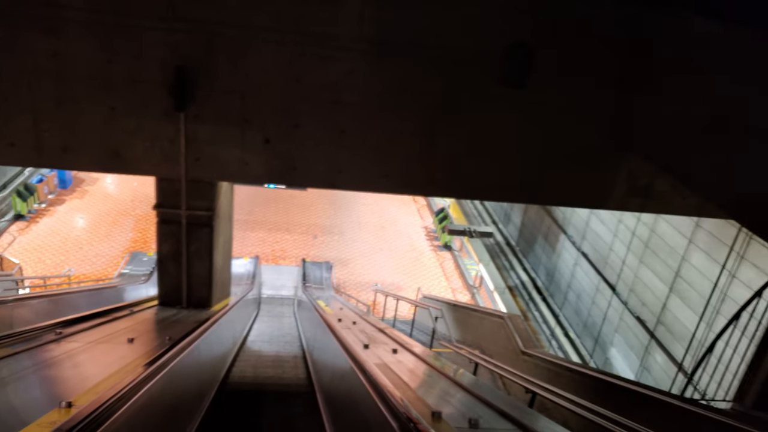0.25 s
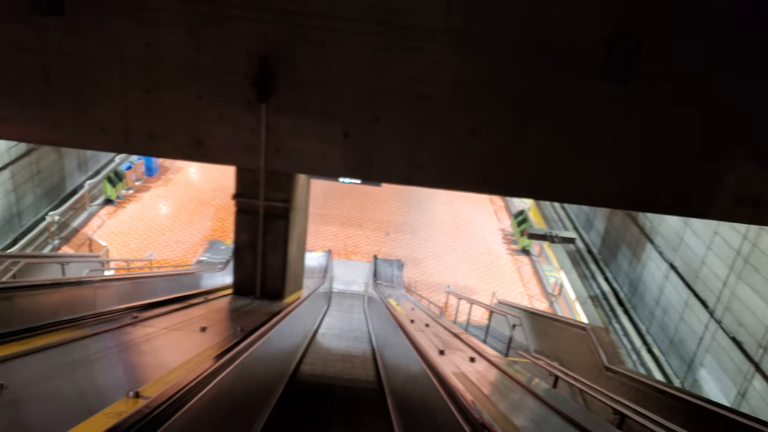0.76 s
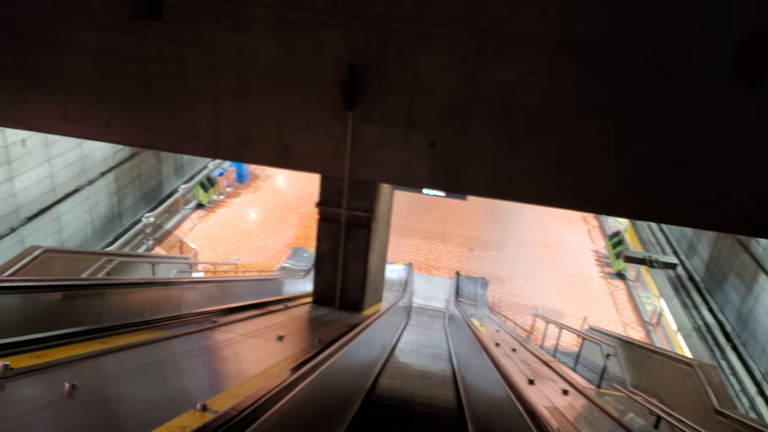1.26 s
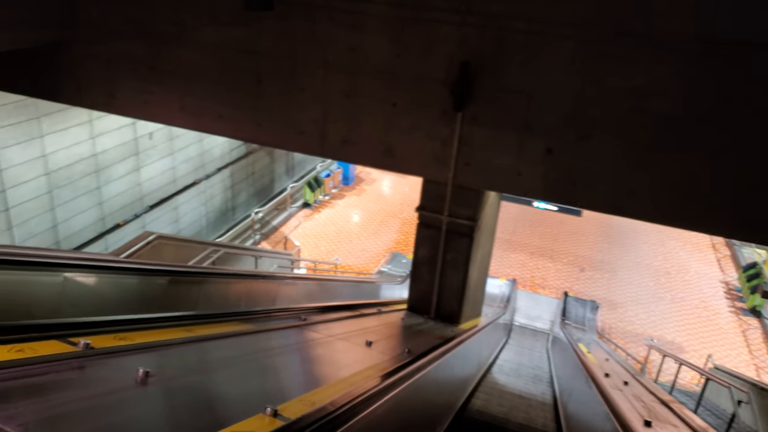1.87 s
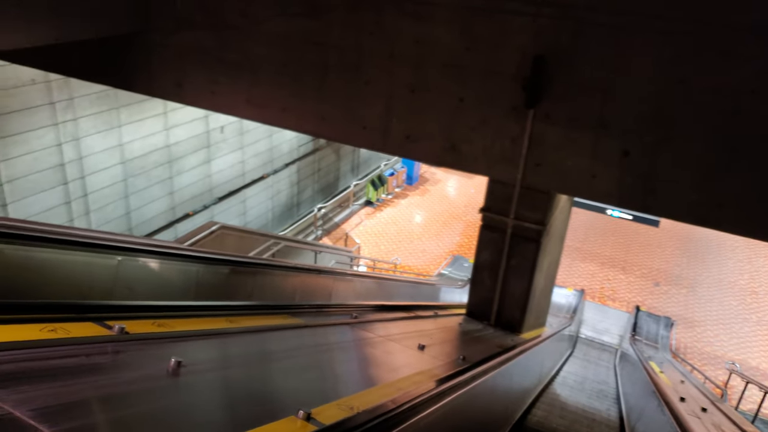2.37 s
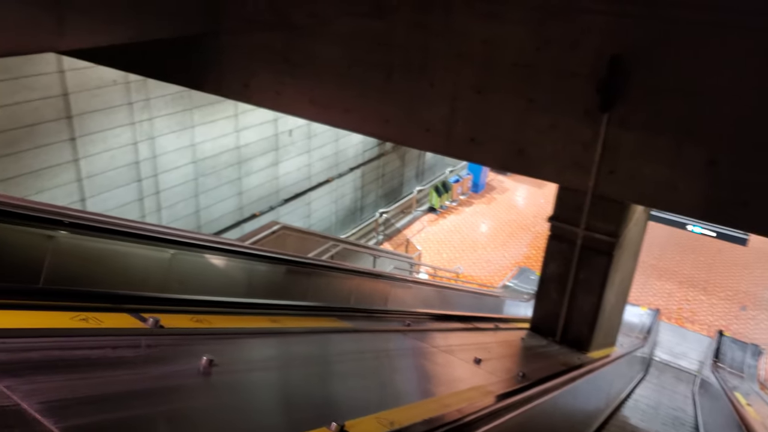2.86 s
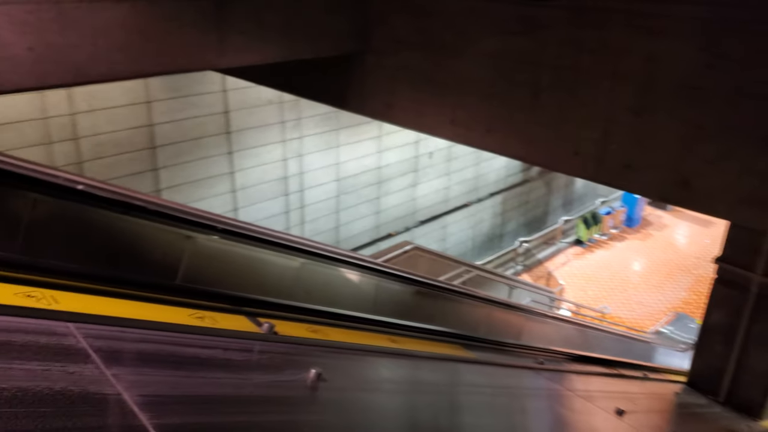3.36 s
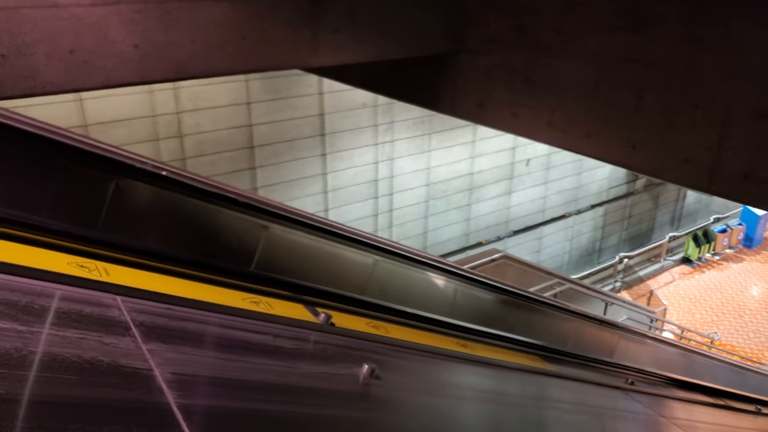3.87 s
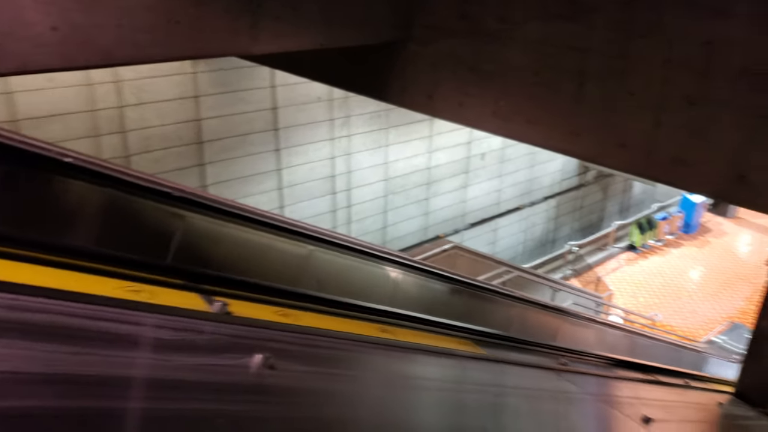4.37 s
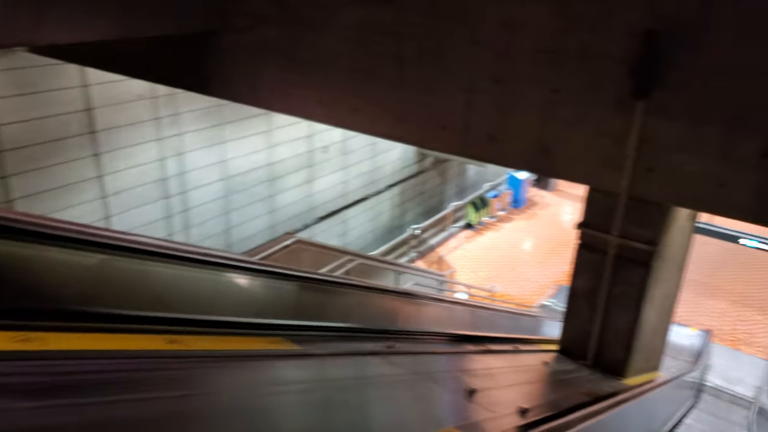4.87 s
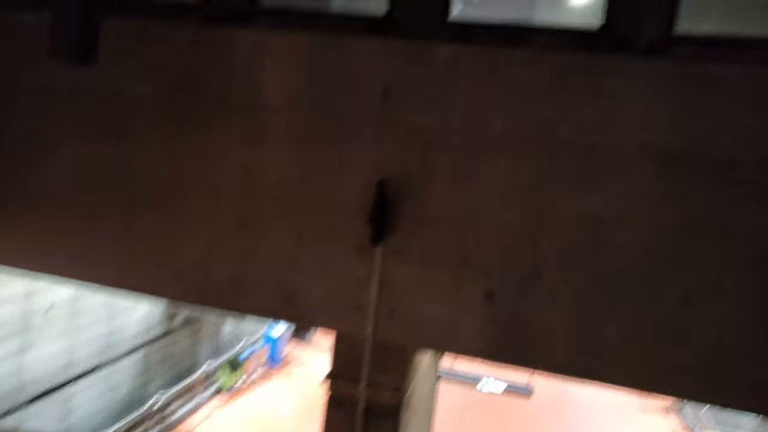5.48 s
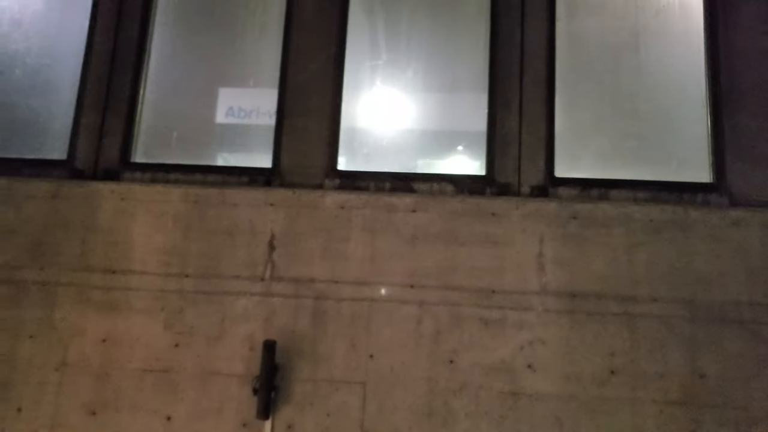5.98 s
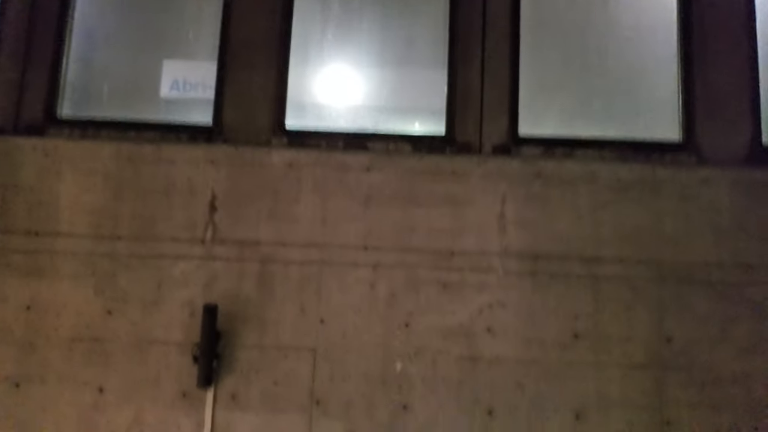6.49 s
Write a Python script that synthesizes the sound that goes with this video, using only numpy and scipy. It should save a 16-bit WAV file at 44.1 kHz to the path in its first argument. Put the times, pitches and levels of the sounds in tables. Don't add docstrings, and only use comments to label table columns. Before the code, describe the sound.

Deep escalator drone, uneven and throbbing, in a reverberant hard-walled hall. Short metallic knocks come at irregular moments, and rollers rub with gritty high chirps. Two long bouts of very high, fluttering squeal sit quietly over the drone, the first loose and swooping, the second tighter and rough, followed by a short whistle. A few tiny dry clicks are close by. Wide stereo, no sharp treble on top.

```python
import sys
import numpy as np
from scipy import signal
from scipy.fft import rfft, irfft
from scipy.io import wavfile
from scipy.ndimage import uniform_filter1d

SR = 44100
rng = np.random.default_rng(int(sys.argv[2]) if len(sys.argv) > 2 else 0)


def put_to_file(sound):
    columns = np.atleast_2d(sound).T
    safe = np.clip(columns, -1, 1)
    whole_steps = np.round(safe * 32767)
    wavfile.write(sys.argv[1], SR, whole_steps.astype(np.int16))


def boost(x):
    u = np.asarray(x, float) / 20
    return 10 ** u


N = 297234
TIME = np.arange(N) / SR
HZ = np.fft.rfftfreq(N, 1 / SR)
NEAR_LEAD = 21.3

# time_s, level_db
HALL_LOUDNESS = [(0.0, -0.5), (0.58, 1), (0.7, 0.84), (2.1, -0.2), (4.3, 0.2), (4.5, 0.34), (5.5, 0),
                 (5.62, 1), (6.74, 1.4)]
# freq_hz, density_db
RUMBLE_COLOUR = [(25, -42), (38, -16), (52, 1), (65, -1), (100, -2), (170, -10), (260, -12), (310, -15.5),
                 (450, -17.5), (520, -15), (600, -20), (800, -22.5), (1000, -35.5), (1500, -62)]
# freq_hz, density_db
CLATTER_COLOUR = [(530, -34), (900, 0.5), (1120, -2.5), (1230, -2), (1590, -5.5), (2500, -8.5), (2860, -10),
                  (3910, -12.5), (5100, -21), (6640, -22), (8450, -31), (13200, -33.5), (15100, -25),
                  (16000, -30)]
# time_s, pitch_hz, level_db
FAR_SQUEAK = [(.525, 2710, -70), (.54, 2690, -53), (.575, 2745, -51), (.59, 2620, -51), (.622, 2620, -51),
              (.634, 2740, -48), (.65, 2720, -58), (.68, 2700, -54), (.73, 2680, -75)]
# start_s, pitch_hz, width_hz, level_db, t60_s
SQUEAKS = [(0.0, 7550, 300, -60, .29), (.22, 7080, 150, -65, .5), (.61, 15200, 900, -60, .4),
           (.71, 7130, 250, -61, .6), (.76, 14200, 500, -66, .4), (.92, 7500, 300, -65, .4),
           (1.27, 7050, 250, -63, .33), (1.495, 7000, 200, -63, .6), (1.64, 7050, 100, -58, .62),
           (1.74, 6780, 150, -64, .46), (2.11, 7740, 200, -61, .8), (1.18, 12200, 900, -67, .6),
           (3.06, 6700, 350, -66, .6), (3.18, 6550, 300, -65, .4), (3.31, 6750, 350, -67, .5),
           (2.82, 6850, 300, -68, .5), (4.08, 5700, 250, -66, .2), (4.13, 6700, 600, -68, .9),
           (4.24, 5950, 250, -67, .3), (4.295, 8450, 100, -68, .15), (4.24, 8420, 100, -64, .2),
           (4.24, 7170, 300, -62, .35), (4.54, 8030, 250, -61, .8), (4.63, 7450, 350, -65, 1.0),
           (4.76, 7080, 200, -64, .55), (4.94, 7000, 300, -66, .5), (5.2, 11200, 1200, -67, .68),
           (5.55, 7380, 400, -60, .95), (5.57, 14500, 900, -66, .4), (.24, 9900, 250, -67, .5),
           (6.26, 7480, 120, -66, .3), (6.355, 7500, 100, -70, .15), (3.1, 8130, 150, -66, .5),
           (5.6, 6950, 300, -65, .9)]
# start_s, pitch_hz,
# width_hz, level_db, t60_s
KNOCKS = [(.02, 1470, 200, -57, 0.34), (.13, 1094, 150, -49, 0.39), (.78, 3265, 40, -65, 3),
          (1.85, 3920, 40, -62, 1.1), (0.0, 3500, 200, -57.5, 0.43), (1.22, 2410, 300, -56.5, .6),
          (.98, 1220, 120, -52, 0.58), (2.37, 1290, 151, -51, 0.62), (4.07, 2020, 700, -51.5, 0.57),
          (4.28, 2500, 200, -52, 0.3), (5.52, 2400, 900, -48.5, 0.55), (5.6, 1275, 200, -54, 3.7),
          (5.94, 2080, 1210, -53, 0.69), (6.03, 2650, 900, -54, 0.42), (6.07, 2300, 1000, -50.5, 0.4),
          (5.3, 52, 20, -38, 1.5), (5.57, 1250, 200, -50, .3), (5.77, 1380, 200, -52, .35),
          (2.24, 2600, 1400, -54, .8), (6.62, 1830, 300, -50.5, 0.88), (5.93, 1290, 500, -59, 2.1),
          (6.6, 1150, 300, -46, 0.64), (6.67, 2600, 395, -53, .6)]
# start_s, peak_db
CHAIN_LINKS = [(1.193, -23), (1.356, -21), (1.673, -27), (1.736, -24), (1.998, -24), (2.163, -29),
               (3.112, -22), (3.227, -23), (3.37, -35), (3.506, -26), (3.574, -19), (.571, -19),
               (5.67, -28), (5.883, -19), (6.062, -18.5), (6.091, -21.5), (3.745, -24), (4.718, -22.5),
               (4.916, -23), (5.177, -20), (5.258, -25), (5.473, -20.5)]
# start_s, peak_db
TICKS = [
    (0.9734, -54),
    (1.2704, -49),
    (5.8933, -45),
]
# pitch_hz, level_db, t60_s
TICK_MODES = [(6600, -1, .008), (9200, -5, .006), (11700, -1, .008)]
# pitch_hz, width_hz, level_db
WHINE_LINES = [(510, 34, -44), (656, 21, -50), (840, 29, -60), (3020, 40, -71), (3272, 30, -63),
               (3625, 32, -66), (3905, 82, -62)]
# time_s, level_db
PANEL_LOAD = [(0.0, -47), (0.49, -43), (0.58, -32.5), (0.69, -47), (0.86, -36.5), (1.24, -42.5),
              (1.69, -36), (1.73, -48), (2.53, -36), (2.57, -47), (3.02, -35), (3.04, -40), (4.17, -37.5),
              (4.18, -45), (5.89, -38.5), (5.95, -48), (5.97, -37), (6.74, -42)]
# start_s, length_s, chirp_db, chirp_hz, hiss_db
RUBS = [(0.232, 0.054, -57, 9250, -66), (0.573, .07, -56.5, 9140, -60), (.74, 0.064, -66, 9250, -65),
        (0.917, .03, -66, 9500, -66), (1.14, .05, -56.5, 9850, -62), (1.277, .05, -61, 9300, -65),
        (1.537, 0.026, -71, 9500, -64), (1.62, .03, -68, 9560, -62), (1.78, .05, -67, 9420, -69),
        (1.93, .03, -72, 9550, -66), (2.14, .07, -64, 9300, -66), (2.62, 0.037, -67, 9850, -75),
        (3.0, 0.12, -69, 9400, -68), (3.7, 0.08, -56.5, 9700, -65), (4.1, .03, -70, 9350, -69),
        (4.238, 0.067, -61, 9310, -69), (4.75, 0.11, -61, 9450, -62), (5.14, .05, -59.5, 9580, -66),
        (5.26, 0.065, -62, 9600, -71), (5.56, .05, -70, 9620, -64), (5.7, .09, -59, 9560, -64),
        (6.17, .04, -68, 9160, -72)]
# time_s, pitch_hz, level_db, looseness (0-1)
SQUEAL_BOUTS = [
    [(1.665, 7830, -49, 0.6), (1.78, 7670, -45, 0.73), (1.9, 7600, -49.5, 0.9), (2.05, 7450, -45.5, .8),
     (2.2, 7420, -50, 1), (2.33, 7680, -50, 0.27), (2.58, 7770, -52, 0.1), (3.33, 7780, -51, 0.01),
     (3.7, 7650, -65, .05)],
    [(4.25, 7270, -62, 0.53), (4.31, 7500, -57, 0.92), (4.43, 7520, -60, 0.67), (4.475, 7790, -55, 0.2),
     (4.54, 7670, -55, 0.1), (4.61, 7830, -56, 0.1), (4.68, 7680, -56, 0.14), (5.2, 7740, -52, .12),
     (5.45, 7480, -72, .1)],
    [(6.39, 7680, -64, .02), (6.42, 7650, -58, 0.02), (6.5, 7690, -58, 0.02), (6.62, 7680, -66, .02)],
]
# tightest_s, turns_per_s, octave_db over the tone, unsteadiness (0 to about 1)
GUIDE_WHEEL = [
    (1.812, 7.6, -10.5, .8),
    (4.925, 8.9, -10, 1.05),
    (6.44, 3.5, -17, .2),
]
# start_s, hold_s, tone_db, octave_db
CATCHES = [(1.668, .02, -52, -66), (1.845, .015, -54, -58), (2.095, .04, -63, -59), (2.24, 0.044, -56, -54),
           (2.345, .015, -54, -61), (2.425, .05, -55, -61), (2.546, 0.048, -52, -61),
           (2.688, .05, -56, -57), (2.83, .035, -56, -60), (2.961, .04, -57, -58),
           (3.077, 0.073, -54.5, -58), (3.207, 0.045, -55, -55), (3.307, 0.042, -50.5, -61),
           (3.445, .02, -59, -72), (3.502, .06, -58.5, -72), (4.245, .015, -60, -63),
           (4.295, .02, -58, -64), (4.35, .015, -54, -72), (4.393, .015, -57, -72), (4.47, .06, -54, -68),
           (4.55, 0.11, -56, -63), (4.735, .06, -55, -61), (4.845, .035, -55, -58), (4.9, .02, -51.5, -62),
           (4.975, 0.06, -56, -61), (5.089, .075, -57.5, -62), (5.24, .015, -53.5, -65),
           (6.393, 0.036, -55, -74), (6.452, .026, -58, -74), (6.503, .016, -57, -74)]
# time_s, level_db of the first order
DRIVE_LOAD = [(0.0, -36), (0.49, -20), (0.64, -27.5), (1.37, -21.5), (1.57, -26.5), (1.74, -23),
              (2.21, -26.5), (2.38, -41), (2.55, -21), (3.06, -25.5), (3.25, -17.5), (3.45, -27),
              (3.95, -27.5), (4.15, -23.5), (4.95, -34), (5.72, -34), (5.95, -26), (6.4, -32)]
# order, start_db, loss_db_per_s, share of first order's swings, own_swing_db
UPPER_ORDERS = [
    (2, -30, 1.5, .1, 2.5),
    (3, -39, 0.56, -.7, 4.0),
]


def rms_one(x):
    return x / np.sqrt(np.mean(np.abs(x) ** 2) + 1e-20)


def in_time(rows):
    s, *columns = np.transpose(rows)
    return [np.interp(TIME, s, c) for c in columns]


def drift(rate_hz):
    step = 40
    r = np.exp(-2 * np.pi * rate_hz * step / SR)
    noise = rng.standard_normal(N // step + 2002)
    slow = signal.lfilter([1], [1, -2 * r, r * r], noise)[2000:]
    return np.interp(np.arange(N) / step, np.arange(len(slow)), rms_one(slow))


def swell(s, rise, hold, t60):
    age = np.maximum(TIME - s, 0)
    attack = np.sin(np.pi / 2 * np.minimum(age / rise, 1)) ** 2
    return attack * boost(-60 * np.maximum(age - rise - hold, 0) / t60)


def grains(per_s, spread_db):
    hits = (rng.random(N) < per_s / SR) * boost(spread_db * np.minimum(rng.exponential(1, N), 3))
    r = np.exp(-1 / (0.012 * SR))
    return signal.lfilter([1], [1, -r], hits)


def diffuse(direct, lead):
    port_gap_m, mismatch_db = 0.17, -28
    a, b, c = rfft(rng.standard_normal((3, N)))
    alike = np.sinc(2 * HZ * port_gap_m / 343) * (1 - boost(2 * mismatch_db + 14.5))
    around = np.array([a, alike * a + np.sqrt(1 - alike ** 2) * b])
    share = np.clip(direct, 0, 1)
    both = np.sqrt(1 - share) * around + np.sqrt(share) * c
    both[1] *= np.exp(-2j * np.pi * HZ * lead / SR)
    return both


def roar(spectrum, patchy_db, shared, direct, lead):
    points = np.array(spectrum)
    octave, point_octave = np.log2(HZ + 1e-9), np.log2(points[:, 0])
    colour = boost(np.interp(octave, point_octave, points[:, 1], -120, -120))
    field, together, out = diffuse(direct, lead) * colour, drift(15.0), 0
    for centre in np.arange(point_octave[0], point_octave[-1] + 1):
        band = np.cos(np.pi / 2 * np.clip(octave - centre, -1, 1)) ** 2
        swing_db = patchy_db * (shared * together + drift(3.9) + 1.6 * drift(55))
        out = out + irfft(field * band, N) * boost(swing_db)
    return rms_one(out)


def narrow(hz, width_hz, field):
    return rms_one(irfft(field / (1 + (2 * (HZ - hz) / width_hz) ** 2), N))


def wavering(pitch_hz, width_hz):
    turn = 2 * np.pi * np.cumsum(pitch_hz) / SR
    return np.array([drift(width_hz) * np.cos(turn) + drift(width_hz) * np.sin(turn) for port in range(2)])


def hall(x, t60):
    t = np.arange(int(1.2 * SR)) / SR
    tail = rng.standard_normal((2, len(t))) * boost(-60 * t / t60) * (t > .012)
    tail = tail / np.sqrt(np.sum(tail ** 2, 1, keepdims=True))
    return signal.fftconvolve(x[None], tail, axes=1)[:, :N]


def rumble(hall_db):
    return boost(hall_db - 24) * roar(RUMBLE_COLOUR, patchy_db=0.84, shared=0.45, direct=0.11, lead=2.4)


def clatter(hall_db):
    wash = roar(CLATTER_COLOUR, patchy_db=1.0, shared=0.29, direct=0.14, lead=NEAR_LEAD)
    return boost(hall_db - 42) * wash


def far_squeak():
    pitch_hz, level_db = in_time(FAR_SQUEAK)
    sounding = (TIME > FAR_SQUEAK[0][0]) * (TIME < FAR_SQUEAK[-1][0])
    tone = sounding * boost(level_db + 3) * np.sin(2 * np.pi * np.cumsum(pitch_hz) / SR)
    return np.array([tone, np.roll(tone, 17)]) + boost(-2) * hall(tone, t60=.6)


def squeaks_and_knocks():
    rise_share = 0.054
    air, out = irfft(diffuse(direct=0.08, lead=NEAR_LEAD), N), np.zeros((2, N))
    for s, hz, width_hz, level_db, t60 in SQUEAKS + KNOCKS:
        span = slice(int(s * SR), int((s + 1.2 * t60) * SR))
        r = np.exp(-np.pi * width_hz / SR)
        resonance = [0.98, 0, -0.96, 1, -2 * r * np.cos(2 * np.pi * hz / SR), r * r]
        band = signal.sosfilt(2 * [resonance], air[:, span])
        out[:, span] += boost(level_db + 8.0) * swell(s, rise_share * t60, 0, t60)[span] * rms_one(band)
    return out * boost(2.0 * drift(45) - .4)


def chain():
    rung = np.zeros(N)
    pitches_hz = rng.uniform(513, 739, len(CHAIN_LINKS))
    for (s, peak_db), hz in zip(CHAIN_LINKS, pitches_hz):
        age = np.maximum(TIME - s, 0)
        rung += boost(peak_db - 3) * np.exp(-age / .006) * np.sin(2 * np.pi * hz * age)
    return np.array([rung, np.roll(rung, 6)]) + boost(-17.0) * hall(rung, t60=0.2)


def ticks():
    click = np.zeros(N)
    for s, peak_db in TICKS:
        age = np.maximum(TIME - s, 0)
        for hz, level_db, t60 in TICK_MODES:
            click += boost(peak_db + level_db - 60 * age / t60) * np.sin(2 * np.pi * hz * age)
    return click * boost(np.array([[-2.5], [2.5]]))


def whine():
    field = diffuse(direct=0.3, lead=7.5)
    panel_db, = in_time(PANEL_LOAD)
    lines = []
    for hz, width_hz, level_db in WHINE_LINES:
        sway_db = drift(1.07) + drift(3.2)
        lines.append(boost(level_db + sway_db) * narrow(hz, width_hz, field))
    return sum(lines[1:]) + lines[0] * boost(1.8 * (panel_db - panel_db.mean()))


def rollers():
    attack_s, chirp_t60_s, hiss_t60_s = 0.015, 0.5, 1.3
    starts, pitches_hz = np.array(RUBS)[:, [0, 3]].T
    pitch_hz = pitches_hz[np.maximum(np.searchsorted(starts, TIME) - 1, 0)]
    chirp_power = boost(-75.5) ** 2
    hiss_power = boost(-64 - 0.6 * TIME) ** 2
    for s, length, chirp_db, hz, hiss_db in RUBS:
        chirp_power = chirp_power + (boost(chirp_db) * swell(s, attack_s, length, chirp_t60_s)) ** 2
        hiss_power = hiss_power + (boost(hiss_db) * swell(s, attack_s, length, hiss_t60_s)) ** 2
    scattered_hz = pitch_hz + .25 * (pitch_hz - 9000) * drift(88.4)
    chirp = boost(-0.5) * np.sqrt(chirp_power) * wavering(scattered_hz, width_hz=94)
    hiss = roar([(4500, -20), (6500, 2), (9000, -3.0), (12000, 2.0), (16000, 0)],
                patchy_db=0.5, shared=1.5, direct=0.089, lead=NEAR_LEAD)
    grit = 1 + .12 * grains(per_s=40, spread_db=3.5)
    return chirp + boost(3) * np.sqrt(hiss_power) * hiss * grit


def squeal():
    swing_hz, scatter_hz, wander_hz = 248, 55, 29.8
    slack_db, slack_octave_db = -10.5, -20
    tone_flare, octave_flare, scoop_hz = 0, 0, 0
    for s, hold, tone_db, high_db in CATCHES:
        catch = swell(s, .008, hold, .07)
        tone_flare = tone_flare + boost(tone_db) * catch
        octave_flare = octave_flare + boost(high_db) * catch
        scoop_hz = scoop_hz + 90 * (TIME > s) * np.exp(-np.abs(TIME - s) / .018)
    dry = np.zeros((2, N))
    for rows, (grip_s, turns_per_s, octave_db, unsteady) in zip(SQUEAL_BOUTS, GUIDE_WHEEL):
        pitch_hz, level_db, loose = in_time(rows)
        loose = np.clip(loose, 0, 1)
        wheel = 2 * np.pi * turns_per_s * (TIME - grip_s)
        start, end = rows[0][0], rows[-1][0]
        gate = np.interp(TIME, [start - .004, start + .004, end - .004, end + .004], [0, 1, 1, 0])
        scatter = scatter_hz * (1.5 - .7 * loose) * drift(134)
        stray_hz = scatter + wander_hz * drift(15) - scoop_hz
        pitch_hz = pitch_hz - swing_hz * loose * np.cos(wheel) + unsteady * stray_hz
        turn = 2 * np.pi * np.cumsum(pitch_hz) / SR
        flutter = gate * boost(4 * unsteady * drift(60) - 1.5)
        tone = np.hypot(boost(level_db - 3.5 + slack_db * (1 - loose)), tone_flare)
        octave = np.hypot(boost(level_db + octave_db + slack_octave_db * (1 - loose)), octave_flare)
        halo = unsteady * boost(-12) * wavering(pitch_hz, width_hz=510)[0]
        dry[0] += flutter * tone * (np.sin(turn) + halo)
        dry[1] += flutter * octave * np.sin(2 * turn)
    rail = dry.sum(0)
    near = np.array([rail, np.roll(rail, 23)])
    return near + hall(dry[0], t60=.4) + boost(-3.5) * hall(dry[1], t60=.15)


def drive():
    mesh_hz = 72.07
    first_db, = in_time(DRIVE_LOAD)
    swings_db = uniform_filter1d(first_db - first_db.mean(), size=SR // 2)
    levels_db = [first_db]
    for order, start_db, loss_db, share, own_db in UPPER_ORDERS:
        levels_db.append(start_db - loss_db * TIME + share * swings_db + own_db * drift(5.3))
    hum = 0
    for order, level_db in enumerate(levels_db, 1):
        turn = 2 * np.pi * mesh_hz * order * TIME + 0.73 * order * drift(1.3)
        hum = hum + np.sqrt(2) * boost(level_db + 0.5) * np.sin(turn)
    return np.array([hum, np.interp(TIME - 9 / SR, TIME, hum)])


def scene():
    hall_db, = in_time(HALL_LOUDNESS)
    background = rumble(hall_db) + clatter(hall_db) + far_squeak() + squeaks_and_knocks()
    machine = chain() + ticks() + whine() + rollers() + squeal() + drive()
    return background + machine


def roll_off(x):
    return signal.sosfilt(signal.butter(12, 17090, fs=SR, output="sos"), x)


def record(dry):
    cut = irfft(rfft(dry) * (HZ < 15790), N)
    return roll_off(cut)


dry = scene()
out = record(dry)
put_to_file(out)
```